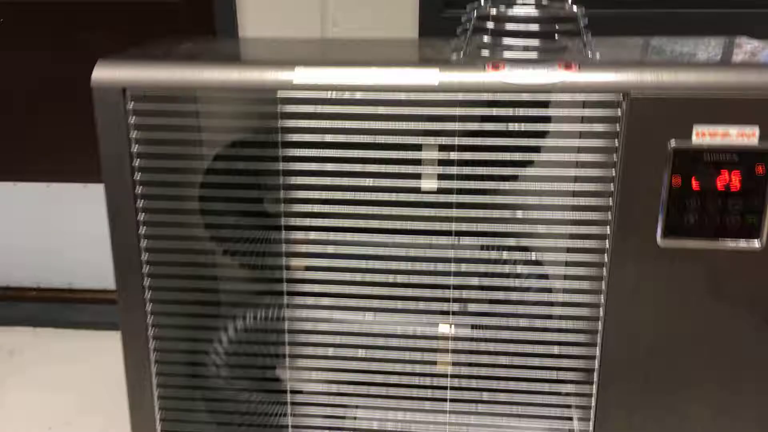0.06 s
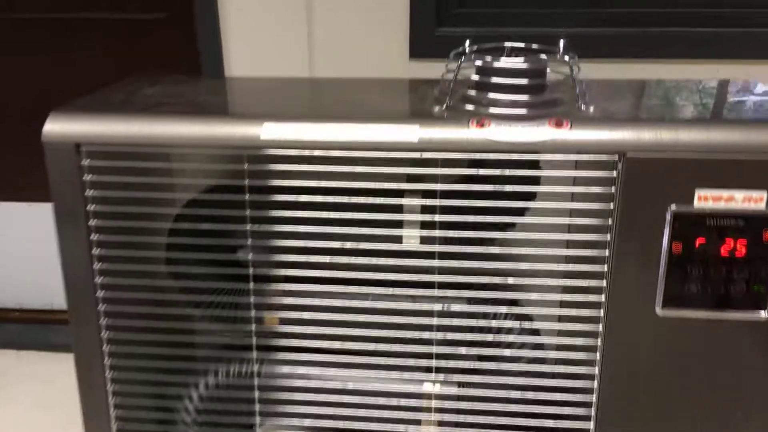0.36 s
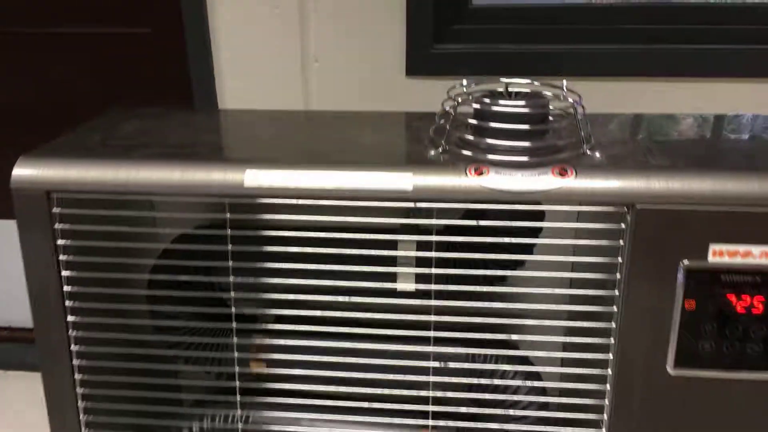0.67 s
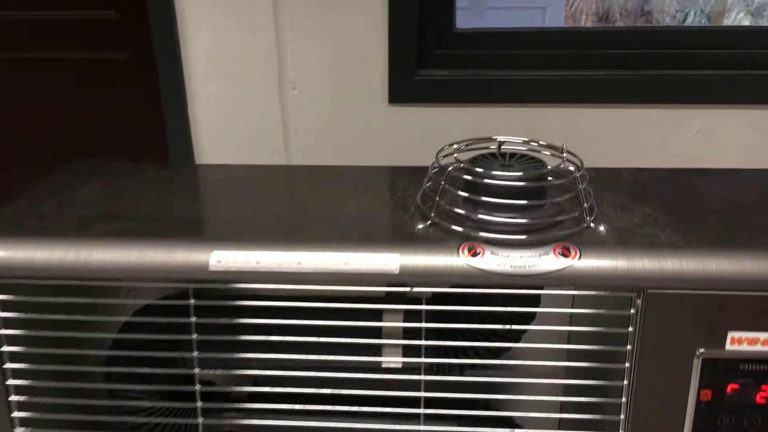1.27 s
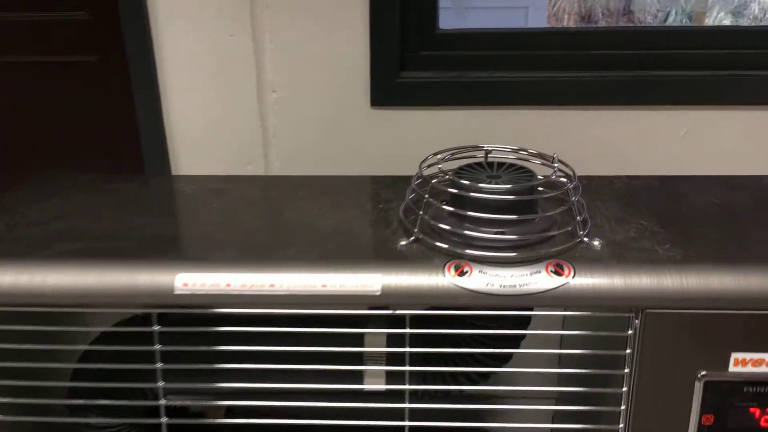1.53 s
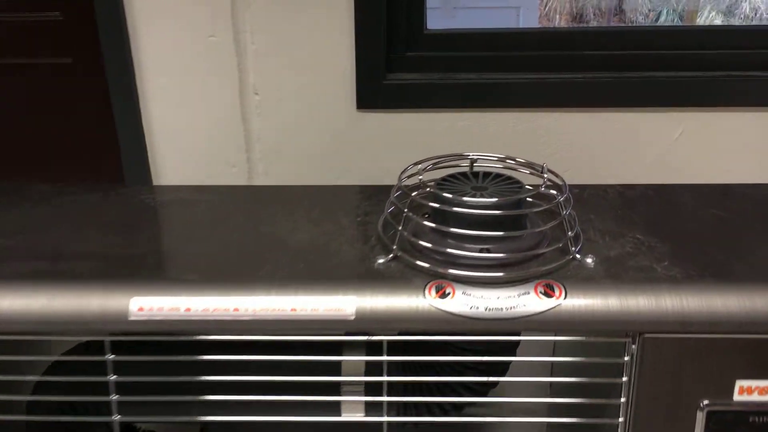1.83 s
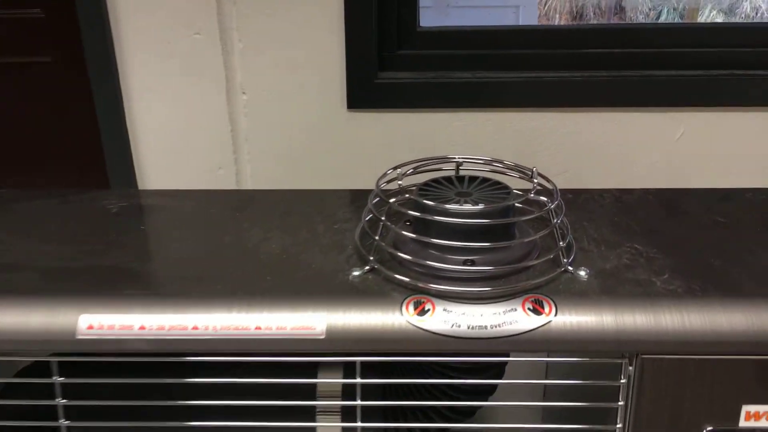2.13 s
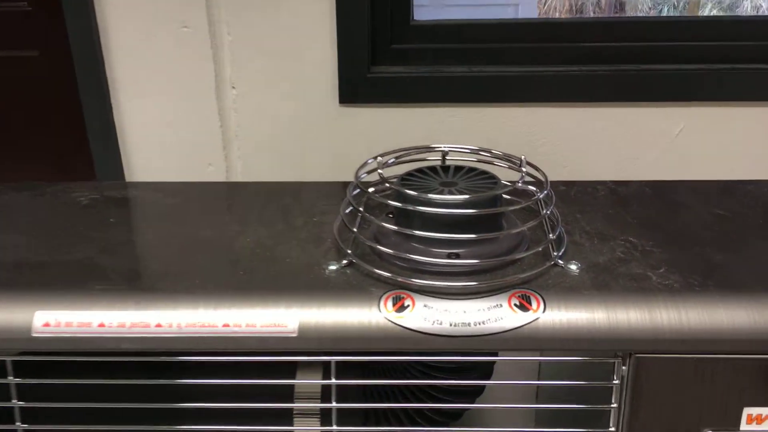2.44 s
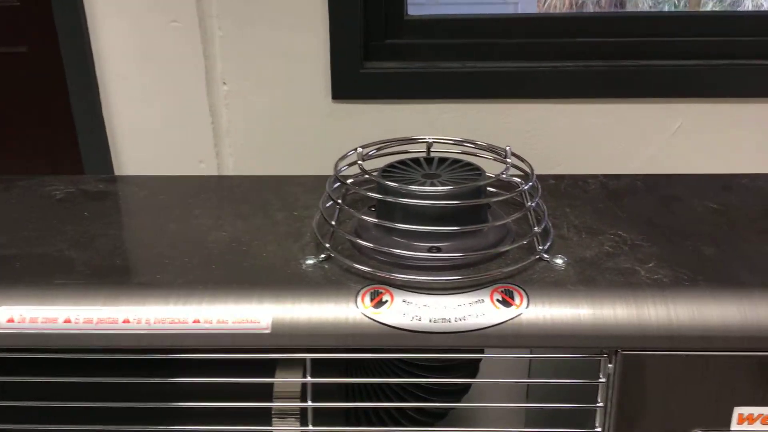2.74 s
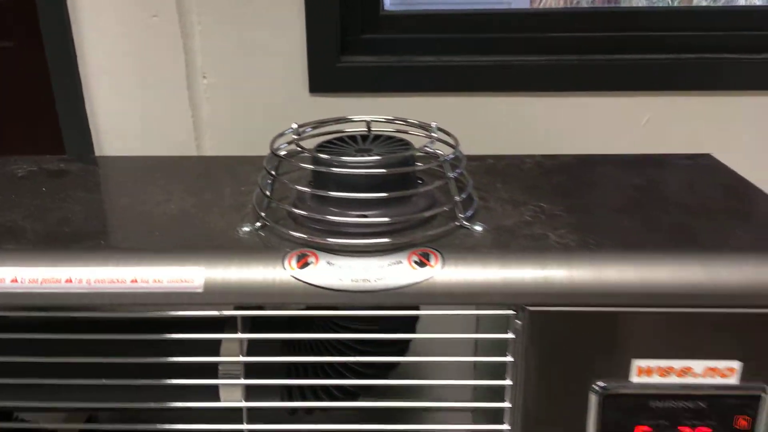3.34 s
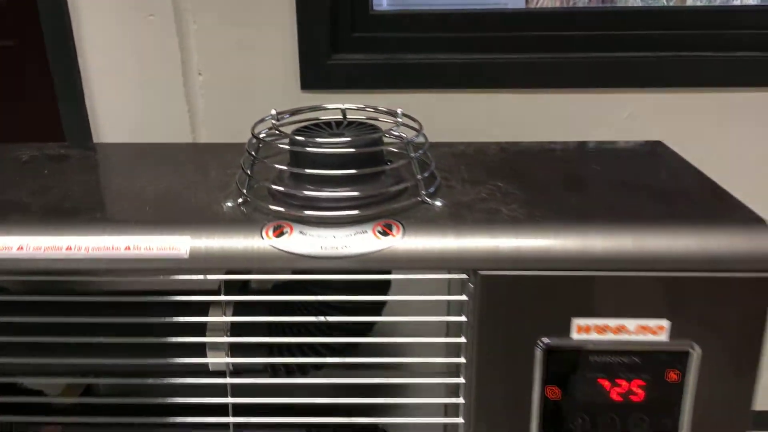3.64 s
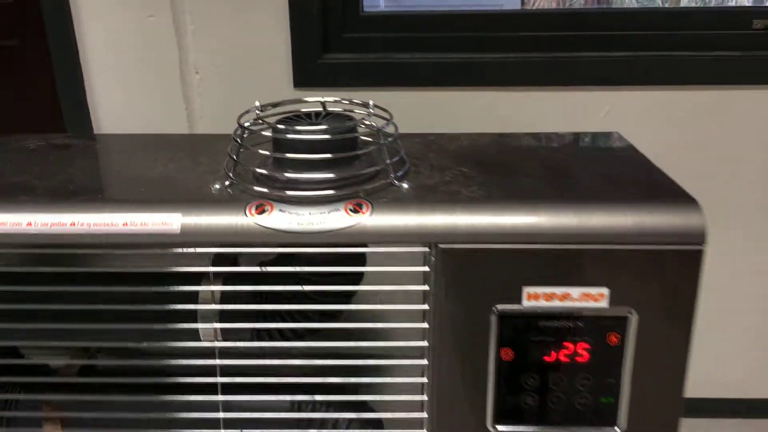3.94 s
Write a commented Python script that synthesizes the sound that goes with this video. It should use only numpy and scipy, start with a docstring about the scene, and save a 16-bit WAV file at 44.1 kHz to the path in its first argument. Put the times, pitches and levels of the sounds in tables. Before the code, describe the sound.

A fuel-burning heater runs in a room for all 4 seconds, with a low drone that surges several times a second over a deep rumble. A hollow flame roar grows slightly over the first second or two, and the rumble swells briefly just before 3 seconds. Throughout, its fan adds a soft rush of air, faint hiss and thin whines, shifting slightly as the microphone moves.

```python
"""A fuel-fired cabinet heater runs in a room while the microphone drifts over its top.
From the start, the restless flame drives a surging drone in the burner chamber, with a deep rumble
below and a hollow roar above. All along, the fan pushes air through ducts and grille: a soft ringing
rush, a faint hiss and a few thin whines. The roar grows over the first second or two, the rumble
swells briefly just before 3 s, and the heater is still running at the end, at 4 s."""
import sys
import numpy as np
from scipy import signal
from scipy.fft import irfft
from scipy.io import wavfile
from scipy.ndimage import uniform_filter1d

SR = 44100
rng = np.random.default_rng(int(sys.argv[2]) if len(sys.argv) > 2 else 0)


def log_audio(samples):
    """Write samples as a 16-bit WAV file to the path given in sys.argv[1]."""
    # one column per channel
    frames = np.atleast_2d(samples).T
    # limit to full scale, then quantise
    limited = np.clip(frames, -1, 1)
    pcm = np.round(limited * 32767).astype(np.int16)
    wavfile.write(sys.argv[1], SR, pcm)


N = 176400  # 4 seconds


def drone(gain_db=-2.5, surge_stretch=1.17, waver_hz=4.45):
    """Air in the burner chamber swings, beats against nearby tones and surges with the flame."""
    # Outline of the surges, before the stretch and gain: time_s, level_db
    surge_outline = [(0.01, -35), (0.07, -31), (0.17, -36.5), (0.32, -28.5), (0.38, -36), (0.53, -28.5),
                     (0.66, -34.5), (0.7, -26), (0.84, -33), (0.9, -26.5), (0.95, -34), (1.0, -25.5),
                     (1.14, -34.5), (1.21, -26), (1.3, -31), (1.35, -24.5), (1.46, -34.5), (1.56, -25.5),
                     (1.65, -36.5), (1.76, -26.5), (1.915, -32.5), (1.955, -25), (2.03, -27), (2.15, -27),
                     (2.295, -31), (2.355, -23), (2.46, -37.5), (2.51, -24), (2.57, -31.5), (2.67, -26.5),
                     (2.8, -33.5), (2.89, -36), (2.93, -25), (3.01, -25), (3.06, -30), (3.17, -28),
                     (3.21, -34), (3.26, -26), (3.36, -38), (3.51, -28.5), (3.61, -38), (3.67, -24.5),
                     (3.71, -27), (3.82, -35), (3.88, -30), (3.96, -26)]
    # The path of the main tone: time_s, pitch_hz
    pitch_path = [(.06, 153.2), (.14, 169.1), (.32, 151.4), (.41, 163.7), (.52, 148.7), (.66, 157),
                  (.78, 149.7), (.92, 162), (1.01, 148), (1.19, 155.8), (1.26, 146), (1.35, 152.5),
                  (1.44, 146.2), (1.58, 163), (1.74, 143), (1.86, 165), (1.95, 148), (2.09, 158.9),
                  (2.2, 148.1), (2.35, 143.7), (2.53, 160.1), (2.67, 146.8), (3.01, 155), (3.29, 144.6),
                  (3.4, 158.9), (3.7, 148.5), (3.96, 153.5)]
    # Other tones the chamber rings at: pitch_hz, width_hz, level_db (relative to the main tone)
    side_tones = [(138.9, 15, -5), (166.6, 7.4, -4.5)]
    level_db = curve(surge_outline)
    surge_db = level_db.mean() + surge_stretch * (level_db - level_db.mean())
    pitch_hz = curve(pitch_path) + waver_hz * eddies(rate_hz=28)  # the flame jostles the pitch
    main_tone = unit(np.sin(2 * np.pi * np.cumsum(pitch_hz) / SR))
    sides = sum(amp(db) * resonance(hz, width) for hz, width, db in side_tones)
    return amp(gain_db + surge_db) * steadied(main_tone + sides, seconds=0.07)


def rumble(level_db=-38.5):
    """The swirling flame makes a deep noise that swells and sinks."""
    # Tone color of the rumble: pitch_hz, relative_db
    spectrum = [(22, -44), (34, -22), (42, -13.5), (51, -2), (62, 1), (74, -6), (84, -5.5), (95, 0.5),
                (110, -9.5), (128, -7), (180, -7), (400, -74)]
    # Swells around the base level: time_s, change_db
    swells = [(0, 0.5), (.35, -7), (.7, -3), (1.03, -3.5), (1.28, 0.5), (1.7, -3.5), (2.22, 2),
              (2.55, -0.7), (2.89, 6.5), (3.0, 1.5), (3.5, 1.1), (3.9, 1.5)]
    return amp(level_db + curve(swells)) * steadied(turbulence(spectrum), seconds=0.083)


def roar():
    """Flame noise makes the hollow cabinet ring."""
    # Tone color of the flame inside the cabinet: pitch_hz, relative_db
    spectrum = [(100, -52), (150, -4.5), (185, 4), (210, -7), (240, -7.5), (262, -9.5), (300, -7),
                (385, -7.5), (440, -9), (505, -8.5), (540, -7.5), (575, -24.5), (800, -32), (2000, -71)]
    # Loudness of that noise, highest close to the burner: time_s, level_db
    loudness = [(0, -46.5), (.8, -42.5), (1.7, -41.5), (2.6, -41.5), (3.9, -41.5)]
    # Tones the cabinet rings at: pitch_hz, width_hz, peak_db, loudest_s, spread_s
    cabinet_tones = [(59, 9.2, -45, 1.6, .5), (209, 31, -46, 3.5, 0.58), (224.3, 10, -45, 2.3, 2.13),
                     (253, 9.4, -49.5, 0.12, 0.77), (319, 7.6, -52.5, 1.1, 0.19),
                     (321.1, 15.4, -47.5, 2.73, 0.72), (355, 24, -55.5, .3, 2.8), (399, 10, -55, .1, 2.4),
                     (440, 15, -48.5, 2.79, 1.54), (469, 15, -52, 2.6, 1.175), (497, 13, -51.5, 1.9, 2.8)]
    flame = amp(curve(loudness)) * steadied(turbulence(spectrum), seconds=0.16)
    return flame + ringing(cabinet_tones)


def rush(patch_db=1.0):
    """Air from the fan rushes in uneven patches and makes the ducts ring."""
    # Tone color of the moving air: pitch_hz, relative_db
    spectrum = [(150, -16.5), (600, 2), (830, -2.5), (1050, -1), (1130, -3.5), (1280, 0), (1430, -6),
                (1560, -4.5), (2050, -7), (2400, -12.5), (2850, -14), (3650, -17), (4200, -22.5),
                (8000, -51)]
    # Loudness of the moving air: time_s, level_db
    loudness = [(0, -55), (.4, -55), (.7, -55.5), (1.3, -55.5), (1.6, -56), (1.85, -53.5), (2.15, -57),
                (2.5, -54.5), (2.75, -54.5), (2.95, -55.5), (3.5, -54.5), (3.9, -55)]
    # Tones the ducts ring at: pitch_hz, width_hz, peak_db, loudest_s, spread_s
    duct_tones = [(762.5, 30, -66.5, 2.9, 3), (951, 58, -58, 2.45, 1.3), (981, 60, -62.5, 0.31, 0.55),
                  (1040, 13.8, -65.5, 1.45, .4), (1078, 18, -64.5, 0.32, .3), (1330, 100, -62, 2.945, 1.34),
                  (1353, 110, -66, .5, .9), (1533, 32, -73.5, 3, 3), (1650, 14, -69, 1.1, 0.51),
                  (1735, 43, -70, 0.43, .55), (2077, 36, -73, .42, 0.27), (2624, 150, -75.5, 2.3, 1.9)]
    air = reflected(turbulence(spectrum), depth_db=1.7, grain_hz=65)
    _, _, bands = signal.stft(air, nperseg=512)
    # Random patches, smoothed over pitch and then time, make each band come and go.
    patches = uniform_filter1d(rng.standard_normal(bands.shape), size=9, axis=0)
    patches = unit(uniform_filter1d(patches, size=8, axis=1))
    patchy_air = signal.istft(bands * amp(patch_db * patches), nperseg=512)[1][:N]
    return amp(curve(loudness)) * steadied(patchy_air, seconds=0.14) + ringing(duct_tones)


def hiss(level_db=-64, split_hz=10000):
    """Air hisses through the grille; its top forms a beam, so it changes most as the microphone moves."""
    # Tone color of the hiss: pitch_hz, relative_db
    spectrum = [(1500, -3), (4200, -4), (4950, -1), (5300, 1), (6800, 2.5), (7300, -0.5), (7850, -2.5),
                (8400, 0.5), (9500, 1), (10350, -4.5), (10900, -2.5), (13500, -3), (15700, -9.5)]
    # Drift in loudness, before it is stretched for the low and high parts: time_s, change_db
    drift = [(0, -0.5), (.38, 0.3), (.65, -1), (1.22, 1), (1.42, -1.5), (1.75, -0.5), (2.55, -2.5),
             (2.95, -0.9), (3.25, -1.5), (3.9, -1)]
    air = reflected(turbulence(spectrum), depth_db=1.1, grain_hz=110)
    drift_db = curve(drift) + 0.17 * eddies(rate_hz=8)
    high = signal.sosfiltfilt(signal.butter(4, split_hz, "high", fs=SR, output="sos"), air)
    low = air - high
    return amp(level_db) * (low * amp(1.26 * drift_db) + high * amp(1.5 * drift_db))


def whines():
    """The fan motor whines and air whistles at the grille."""
    # Thin, high tones: pitch_hz, width_hz, peak_db, loudest_s, spread_s
    thin_tones = [(1475, 5, -69, .9, 1.3), (2751, 6, -81, .4, 2.5), (3070, 90, -79.5, 1.2, 2.2),
                  (4520, 150, -77, 3.3, .9), (4610, 170, -76.6, .9, 1.8), (6500, 700, -75, 3.52, .22),
                  (7040, 80, -84, 2, 3), (8188, 50, -79, .5, .22), (8190, 50, -80.5, 1.17, .3),
                  (9080, 230, -79, .5, 4)]
    return ringing(thin_tones)


def ringing(tones, fade_db=10):
    """Each tone swells and fades as the microphone drifts past the spot where it is loudest."""
    t, out = np.arange(N) / SR, np.zeros(N)
    for pitch_hz, width_hz, peak_db, loudest_s, spread_s in tones:
        away = 1 - np.exp(-((t - loudest_s) / spread_s) ** 2)  # 0 at the spot, 1 far from it
        out += amp(peak_db - fade_db * away) * steadied(resonance(pitch_hz, width_hz), seconds=0.31)
    return out


def resonance(pitch_hz, width_hz):
    """A narrow band of noise: a tone kept ringing by swirling air."""
    return noise(lambda hz: (1 + 2 * ((hz - pitch_hz) / width_hz) ** 2) ** -1.5)


def reflected(x, depth_db, grain_hz, pattern_s=0.7):
    """Echoes off cabinet and walls lift some pitches and dip others, shifting as the microphone moves."""
    hz, t, bands = signal.stft(x, SR, nperseg=2048)
    ripple = uniform_filter1d(rng.standard_normal(bands.shape), round(grain_hz / hz[1]), axis=0)
    ripple = unit(uniform_filter1d(ripple, round(pattern_s / t[1]), axis=1))
    return unit(signal.istft(bands * amp(depth_db * ripple), nperseg=2048)[1][:N])


def turbulence(spectrum):
    """The broad noise of swirling gas, shaped by (pitch_hz, relative_db) points."""
    pitch_hz, db = np.transpose(spectrum)
    return noise(lambda hz: amp(np.interp(np.log(hz + 1), np.log(pitch_hz), db, right=-120)))


def eddies(rate_hz):
    """Small swirls of air: a random wobble from 1 Hz up to about rate_hz."""
    return noise(lambda hz: (hz > 1) / (1 + (hz / rate_hz) ** 4))


def noise(gain):
    """Noise of average strength 1, with its pitches weighted by gain(hz)."""
    hz = np.fft.rfftfreq(N, 1 / SR)
    random_phases = np.exp(2j * np.pi * rng.random(len(hz)))
    return unit(irfft(gain(hz) * random_phases, N))


def steadied(x, seconds):
    """Evens out slow swells and keeps the quick throb."""
    size = int(seconds * SR)
    power = uniform_filter1d(uniform_filter1d(x ** 2, size), size)
    return x / np.sqrt(power + 1e-12)


def curve(points):
    """Joins (time_s, value) points with straight lines."""
    return np.interp(np.arange(N) / SR, *np.transpose(points))


def amp(db):
    """Turns decibels into a gain."""
    return 10 ** (np.asarray(db) / 20)


def unit(x):
    """Scales to an average strength (rms) of 1."""
    return x / np.sqrt(np.mean(x ** 2) + 1e-30)


def scene(flutter_db=0.64):
    """Flame and fan together; the same swirls shake the roar, the rush and, less, the hiss."""
    flutter = amp(flutter_db * eddies(rate_hz=30))
    heater = rumble() + drone() + flutter * (roar() + rush()) + flutter ** 0.85 * hiss() + whines()
    return heater[None]  # one channel


def record(dry, cutoff_hz=15750):
    """Cuts off the very highest treble."""
    low_pass = signal.firwin(1023, cutoff_hz, window=("kaiser", 9), fs=SR)
    return signal.oaconvolve(dry, low_pass[None], "same")


dry = scene()
out = record(dry)
log_audio(out)
```